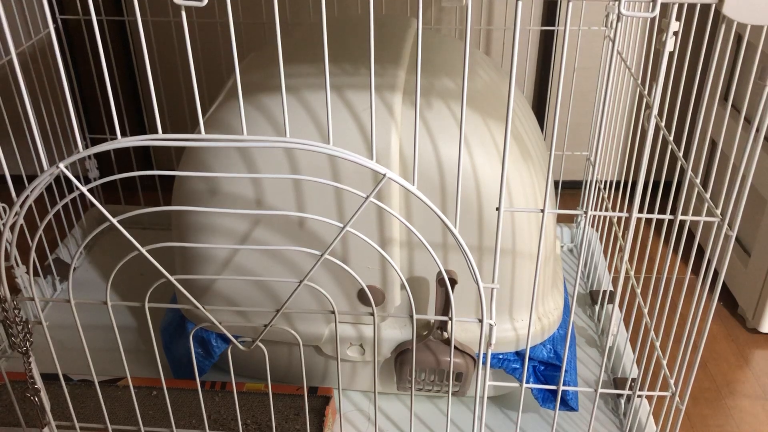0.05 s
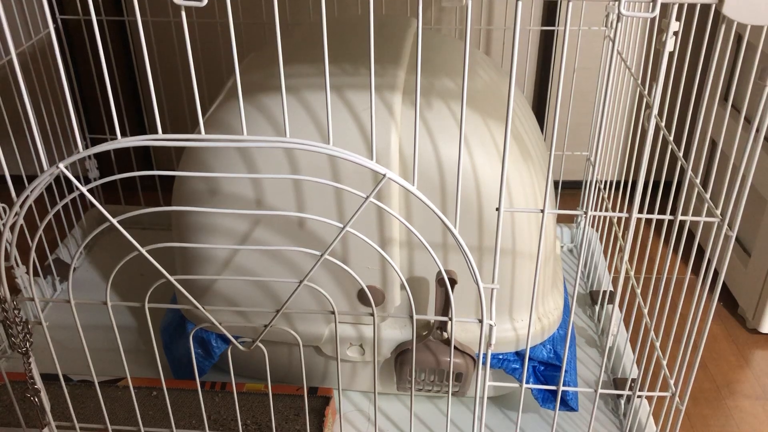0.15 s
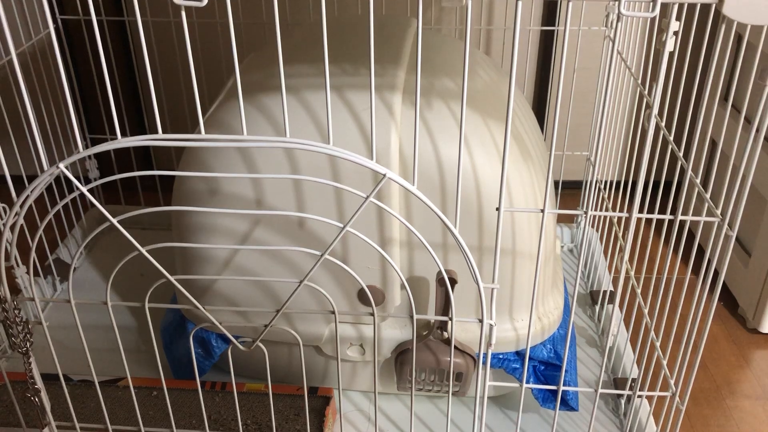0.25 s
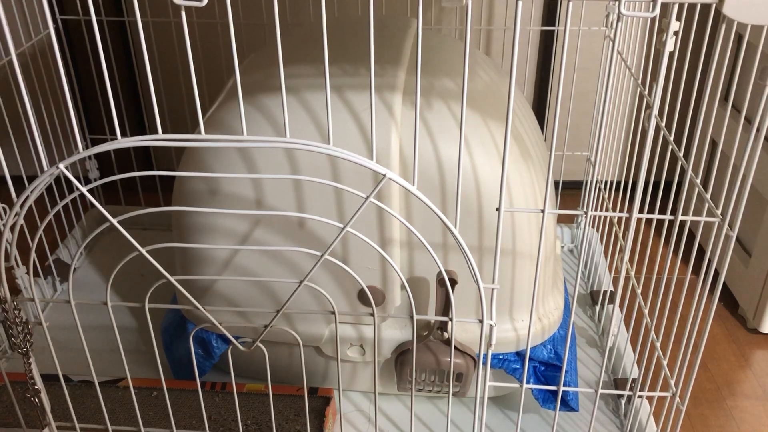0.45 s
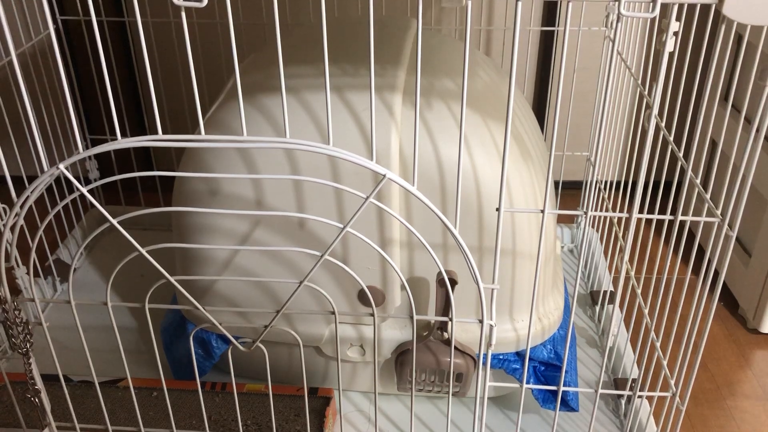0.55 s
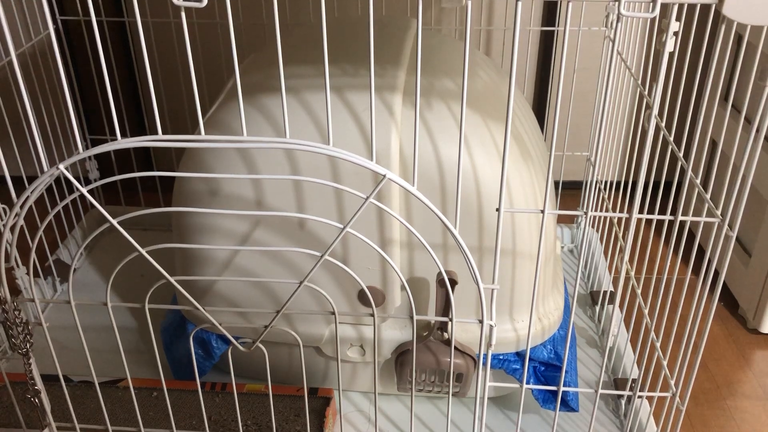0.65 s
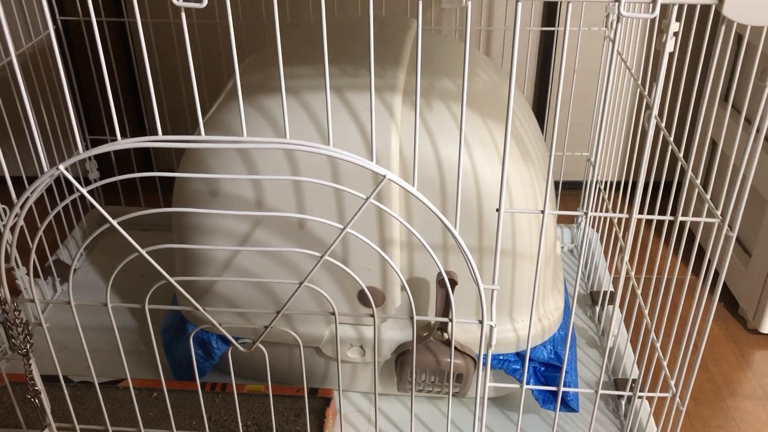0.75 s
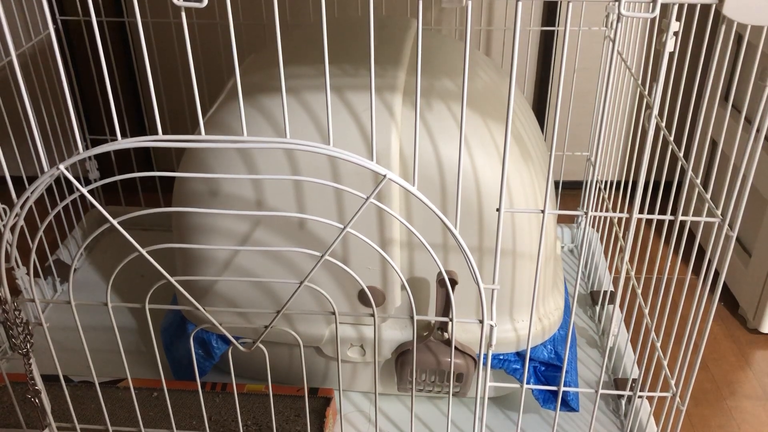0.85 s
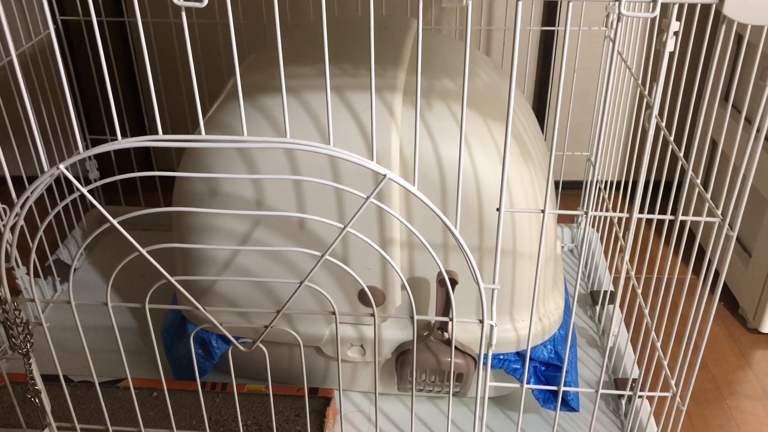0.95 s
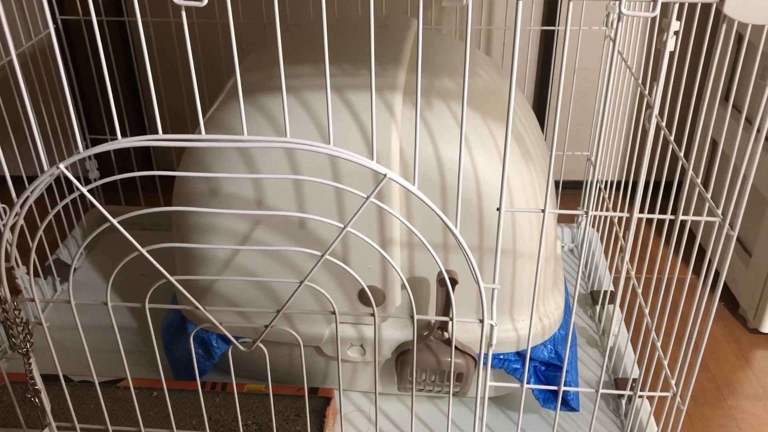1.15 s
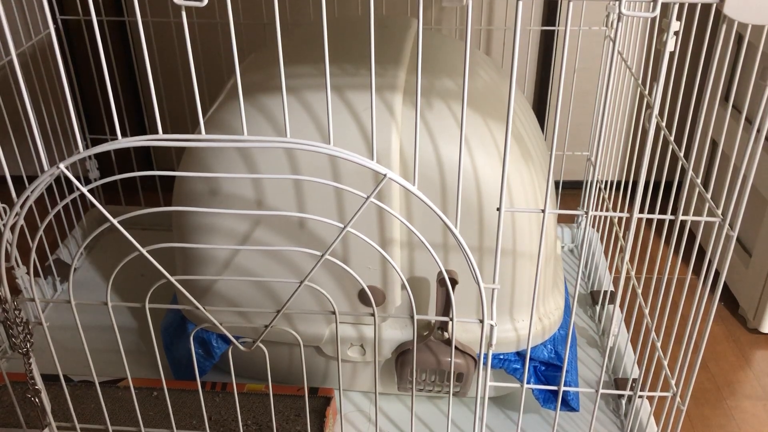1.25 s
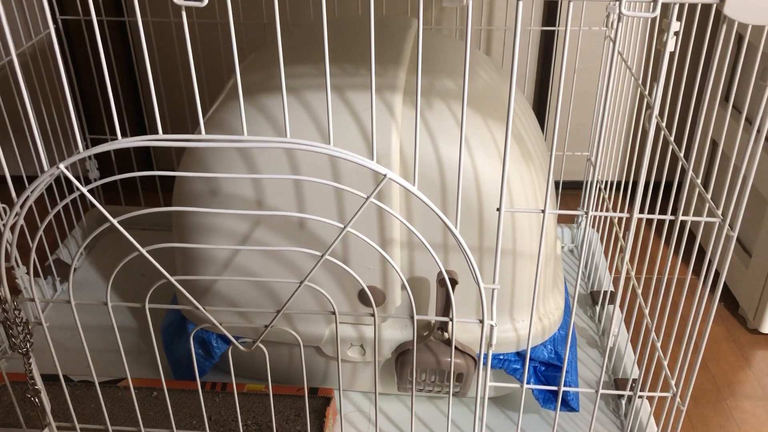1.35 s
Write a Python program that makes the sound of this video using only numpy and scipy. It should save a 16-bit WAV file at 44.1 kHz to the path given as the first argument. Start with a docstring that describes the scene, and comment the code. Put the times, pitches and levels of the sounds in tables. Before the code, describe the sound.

A cat's claw pops off plastic sheeting, followed by soft scratching inside a covered litter box.

```python
"""A cat claws the plastic sheet in a hooded litter box in a small room.
First come faint scrapes and soft paw thuds while a claw snags with a few ticks. At about 0.24 s it
lets go with one sharp pop that rings the hood. Then the paw scrapes in short strokes, the claws
zipping as they stick and slip, and the strokes trail off. An appliance hums behind throughout."""
import sys
import numpy as np
from scipy import signal
from scipy.fft import rfft, irfft, next_fast_len
from scipy.io import wavfile
from scipy.ndimage import map_coordinates

SR = 44100
rng = np.random.default_rng(int(sys.argv[2]) if len(sys.argv) > 2 else 0)


def master(y):
    """Save y as 16-bit WAV."""
    cut = np.clip(np.atleast_2d(y).T, -1, 1)
    pcm = np.round(cut * 32767)  # scale
    wavfile.write(sys.argv[1], SR, pcm.astype(np.int16))


N = 61739

# tone colour of claws on the sheet, for ticks and scrapes: f/Hz, relative level/dB
CLAW_EQ = [(70, -20), (170, -1.5), (350, -0.5), (720, 0.5), (950, 1.5), (1400, -0.5), (2300, -2),
           (3800, -10.5), (5000, -9.5), (6500, -14), (10000, -19), (16000, -22)]


def pop():
    """The taut sheet snaps off a claw; the hood echoes and rings."""
    # short modes of the snapping sheet: f/Hz, relative level/dB, t60/s
    sheet_modes = [(193.6, -18.5, 0.087), (340, -14.5, .015), (700, -12.5, 0.0098), (1005, -3, 0.025),
                   (1660, -8, 0.017), (2550, -13, 0.012), (3590, -15, 0.0052), (4370, -4.5, 0.0044),
                   (5030, -7.5, 0.0049), (8290, -11.5, 0.0032)]
    # bright crack of the attack: f/Hz, relative level/dB
    crack_eq = [(500, -14), (2000, -3.5), (5000, 3.5), (8700, -6.5), (11000, -19), (16000, -17)]
    # early reflections off the hood's walls: delay/s, relative level/dB
    reflections = [(.0046, -23), (.0073, -3.5), (.0108, -14), (0.0138, -13)]
    # modes of the hood ringing on: f/Hz, relative level/dB, t60/s
    hood_modes = [(112, -25, .17), (151, 1.5, 0.15), (185.7, 3, 0.14), (240.8, 1.5, 0.17), (588, 2.5, 0.11),
                  (800, 6, 0.18), (872, -2.5, 0.31), (1374, 4, 0.2), (1593, -3.5, 0.33), (1798, 1, 0.21),
                  (2035, -6, 0.14), (2450, -9, .28), (2970, -7, 0.17)]
    # the pop's wash in the box and room: f/Hz, relative level/dB
    wash_eq = [(60, -37), (130, 0), (260, -3), (520, -4), (850, -2), (1200, -4), (1700, -3), (2800, -8.5),
               (3700, -17), (5600, -15.5), (7500, -24.5), (15000, -28.5)]
    start_s, level_db = 0.2356, -20
    snap = ring(sheet_modes) + amp(-4.5) * noise(crack_eq) * fade(t60=0.0051)
    echoes = dulled(sum(amp(db) * delayed(snap, s) for s, db in reflections), edge_hz=3430)
    hood = amp(-27.5) * ring(hood_modes) * attack(rise_s=0.0033)
    wash = amp(-13) * room_decay(noise(wash_eq))
    return amp(level_db) * delayed(snap + echoes + hood + wash, start_s)


def ticks():
    """Small snaps as a claw catches in the sheet."""
    # claw catches: t/s, level/dB, tilt/(dB per octave), treble edge/Hz
    catches = [(0.0707, -43, 6.5, 6040), (0.1376, -51, 6.5, 8000), (0.2005, -44, 4.5, 11000),
               (0.461, -54, -6, 10000), (0.4694, -45, 1, 9000), (0.8108, -43, -4, 5000)]
    out = np.zeros(N)
    for s, db, tilt_db, edge_hz in catches:
        burst = noise(CLAW_EQ, tilt_db) * fade(t60=0.011)
        out += amp(db) * delayed(dulled(burst, edge_hz), s)
    return in_room(out, wet_db=0)


def scrapes():
    """Each paw stroke swells and dies: grainy rubbing with the sheet's hiss on top."""
    # strokes: peak t/s, rise/s, fall/s, level/dB, tilt/(dB per octave), hiss mix/dB, treble edge/Hz
    strokes = [(0.01, 0.056, 0.028, -56, -0.5, -23, 15100), (0.077, 0.022, .025, -56, -3, -11, 12400),
               (.146, 0.018, 0.043, -59, -0.5, -23, 15000), (0.209, 0.012, 0.015, -57, -2, -16, 15000),
               (.495, 0.034, 0.032, -47.5, -0.5, -10, 14900), (0.53, 0.023, 0.028, -52, -1.5, -33, 6000),
               (.642, 0.04, 0.053, -55, -2, -18, 14000), (0.786, 0.058, 0.075, -63, -.5, -6, 12100),
               (0.835, 0.022, 0.015, -55, 0, 3.5, 15000), (.88, 0.017, 0.023, -59.5, 1.5, -6, 9900),
               (0.941, 0.028, 0.044, -64, -2.5, -24, 12000), (.995, 0.018, 0.043, -58.5, 3.5, -17, 3600),
               (1.089, 0.032, .06, -71, 0.5, -16, 6000), (1.308, 0.0085, 0.017, -72, 1, -28, 9000)]
    # hiss of the sheet: f/Hz, relative level/dB
    hiss_eq = [(1500, -17), (2700, -7), (3300, -3), (4100, 0), (4700, -4), (5500, -7), (7200, -17),
               (11000, -22.5), (15000, -19.5)]
    t, out = clock(), np.zeros(N)
    for s, rise, fall, db, tilt_db, hiss_db, edge_hz in strokes:
        pressure = np.exp(-((t - s) / np.where(t < s, rise, fall)) ** 2)
        rubbing = coloured(grains(), CLAW_EQ, tilt_db)
        hiss = amp(hiss_db) * coloured(grains(), hiss_eq)
        out += amp(db) * pressure * dulled(rubbing + hiss, edge_hz)
    return in_room(out, wet_db=-2)


def grains(per_s=6000, spread_db=3):
    """The texture of a scrape: a dense rain of tiny slips of uneven size."""
    slipping = rng.random(N) < per_s / SR
    size = amp(spread_db * rng.standard_normal(N))
    return slipping * size * rng.choice([-1, 1], N)


def zips():
    """A claw sticks and slips at a rate that rises and falls with its speed."""
    # claw drags over the sheet: middle t/s, length/s, top slip rate/Hz, level/dB
    drags = [(0.041, .012, 1150, -55.5), (0.143, .02, 1050, -55.5), (.489, .022, 1095, -44.5),
             (.501, .024, 1028, -47), (0.828, .026, 1218, -54), (.833, 0.013, 829, -52),
             (.858, .04, 1277, -59.5), (0.869, 0.01576, 1121, -55)]
    sag, jitter, overtone_db = 0.5, 0.0807, -11.5
    out = np.zeros(N)
    for s, length, top_hz, db in drags:
        travel = np.clip(2 * (clock() - s) / length, -1, 1)  # -1 at the start, 1 at the end
        slip_hz = top_hz * (1 - sag * travel ** 2) * (1 + jitter * wobble(500))
        phase = 2 * np.pi * np.cumsum(slip_hz) / SR
        slips = np.sin(phase) + amp(overtone_db) * np.sin(2 * phase)
        out += amp(db) * (1 - travel ** 2) * unit(slips)
    return in_room(out, wet_db=-3)


def thuds():
    """The paw's weight lands softly on the floor of the box."""
    # paw landings: t/s, level/dB
    landings = [(.07, -53.5), (.16, -51.5), (0.474, -74)]
    # low modes of the box floor: f/Hz, relative level/dB, t60/s
    floor_modes = [(140.6, -1, 0.25), (262, -5, 0.18)]
    return sum(amp(db) * delayed(ring(floor_modes) * attack(rise_s=0.003), s) for s, db in landings)


def appliance_hum():
    """An appliance's low tones, each wavering a little in level and phase."""
    # hum partials: f/Hz, rms level/dB
    partials = [(49.5, -72.5), (75, -73), (141, -71.5), (183, -71), (353.3, -62)]
    waver_db, waver_rad = 0.6, 0.3
    out = np.zeros(N)
    for hz, db in partials:
        gain = amp(db + waver_db * wobble(7.8))
        phase = 2 * np.pi * hz * clock() + waver_rad * wobble(10.7)
        out += gain * unit(np.sin(phase))
    return out


def room_tone():
    """The room's low, steady rush."""
    # colour of the rush: f/Hz, relative level/dB
    air_eq = [(20, -25), (45, -4.5), (65, 6.5), (100, -6), (150, -2.5), (250, -3), (400, -7.5), (510, -12),
              (750, -9.5), (1100, -16), (2000, -18.5), (4000, -29), (8000, -34), (16000, -38)]
    return amp(-62.5) * noise(air_eq)


def room_decay(x):
    """x with a fast attack, then fading band by band as sound does in the room."""
    # reverb time by band: f/Hz, t60/s
    reverb_times = [(150, 0.39), (800, 0.18), (2500, 0.26), (6000, 0.22), (14000, 0.22)]
    centres, t60s = np.transpose(reverb_times)
    bands = [filtered(x, lambda hz: along(np.c_[centres, share], hz)) for share in np.eye(len(centres))]
    return sum(band * fade(t60) for band, t60 in zip(bands, t60s)) * attack(rise_s=0.0013)


def in_room(x, wet_db):
    """x with its reverb, at about the same overall power."""
    tail = room_decay(rng.standard_normal(N))
    wet = signal.fftconvolve(x, tail / np.linalg.norm(tail))[:N]
    return (x + amp(wet_db) * wet) / np.hypot(1, amp(wet_db))


def amp(db):
    """Decibels to gain."""
    return 10 ** (np.asarray(db) / 20)


def unit(x):
    """x scaled to rms 1."""
    return x / np.sqrt(np.mean(x ** 2) + 1e-20)


def clock():
    """Seconds at each sample."""
    return np.arange(N) / SR


def along(points, hz):
    """A curve through (f/Hz, value) points, read at hz on a log axis."""
    freqs, values = np.transpose(points)
    return np.interp(np.log(hz + 1), np.log(freqs + 1), values)


def filtered(x, response):
    """x through a zero-phase filter whose gain is response(hz)."""
    size = next_fast_len(N + SR // 2)
    return irfft(rfft(x, size) * response(np.fft.rfftfreq(size, 1 / SR)), size)[:N]


def coloured(x, eq, tilt_db=0):
    """x through an EQ curve and a tilt per octave, at rms 1."""
    return unit(filtered(x, lambda hz: amp(along(eq, hz) + tilt_db * np.log2(hz + 20))))


def dulled(x, edge_hz):
    """x with its treble rolled off above an edge."""
    return signal.sosfilt(signal.butter(2, edge_hz, fs=SR, output="sos"), x)


def noise(eq, tilt_db=0):
    """Coloured noise of rms 1."""
    return coloured(rng.standard_normal(N), eq, tilt_db)


def wobble(rate):
    """A smooth random curve, rate knots a second."""
    return map_coordinates(rng.standard_normal(int(N * rate / SR) + 4), [clock() * rate])


def attack(rise_s):
    """A rise from 0 to 1 with time constant rise_s."""
    return 1 - np.exp(-clock() / rise_s)


def fade(t60):
    """A decay of 60 dB in t60 seconds."""
    return np.exp(-np.log(1000) * clock() / t60)


def delayed(x, s):
    """x starting s seconds later."""
    return np.pad(x, (round(s * SR), 0))[:N]


def ring(modes):
    """Damped sines of alternating sign, their levels a little different at each hit."""
    return sum((-1) ** k * amp(db + rng.normal(0, 1)) * fade(t60) * np.sin(2 * np.pi * hz * clock())
               for k, (hz, db, t60) in enumerate(modes))


def scene():
    """The cat in its box over the hum and room tone, in mono."""
    return (pop() + ticks() + scrapes() + zips() + thuds() + appliance_hum() + room_tone())[None]


def record(dry):
    """A brick-wall high cut on the whole mix."""
    top_hz = 16000
    return np.array([filtered(x, lambda hz: hz < top_hz) for x in dry])


dry = scene()
out = record(dry)
master(out)
```